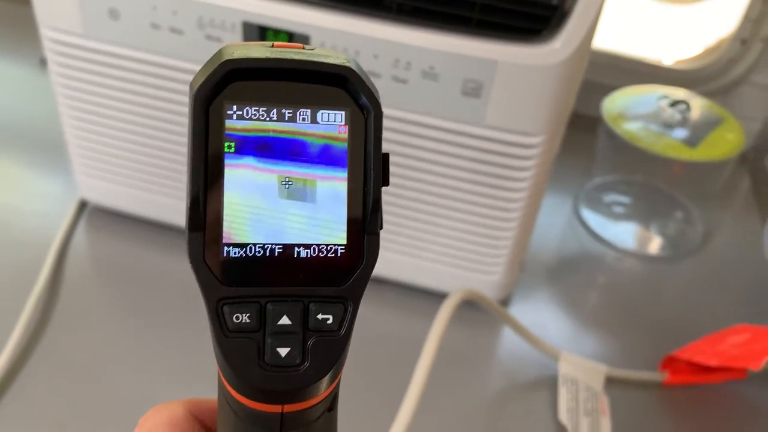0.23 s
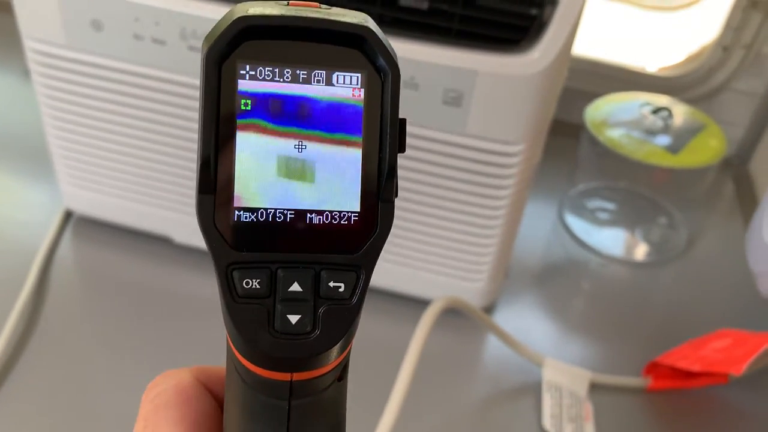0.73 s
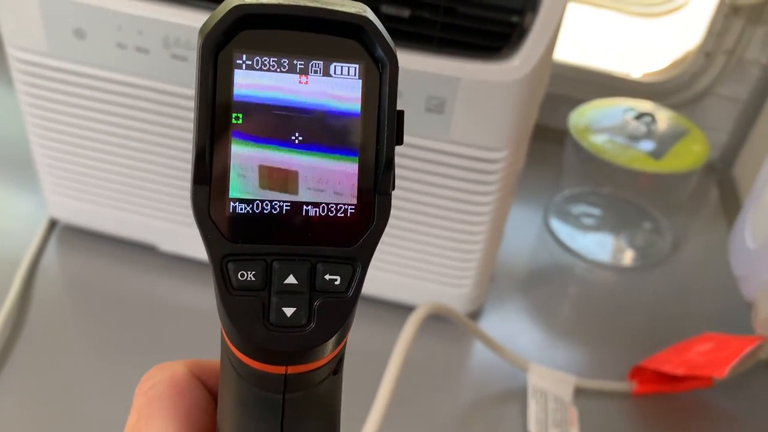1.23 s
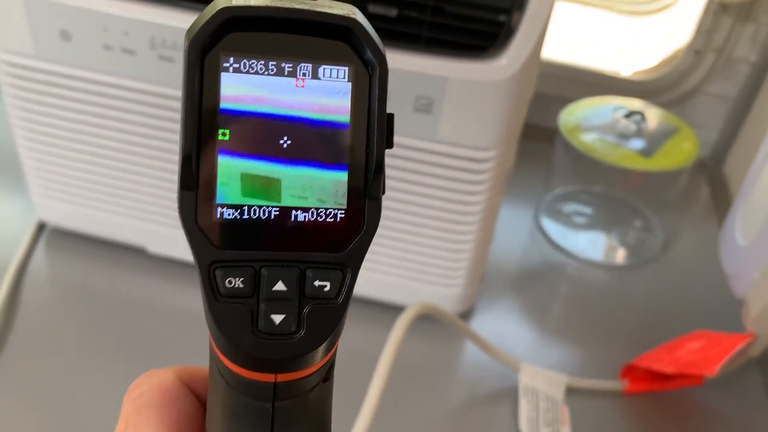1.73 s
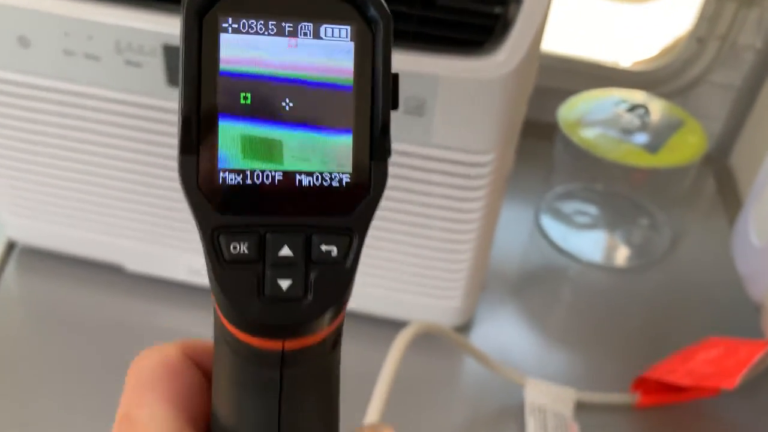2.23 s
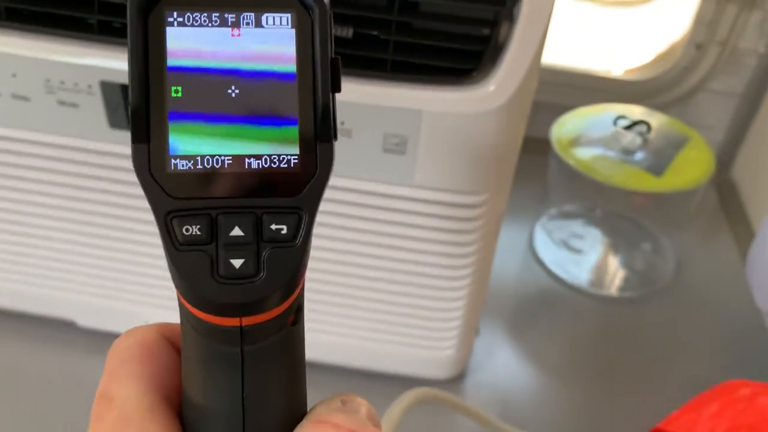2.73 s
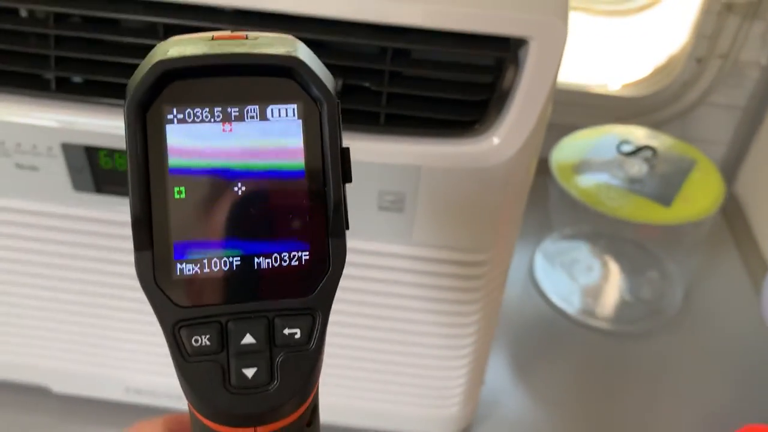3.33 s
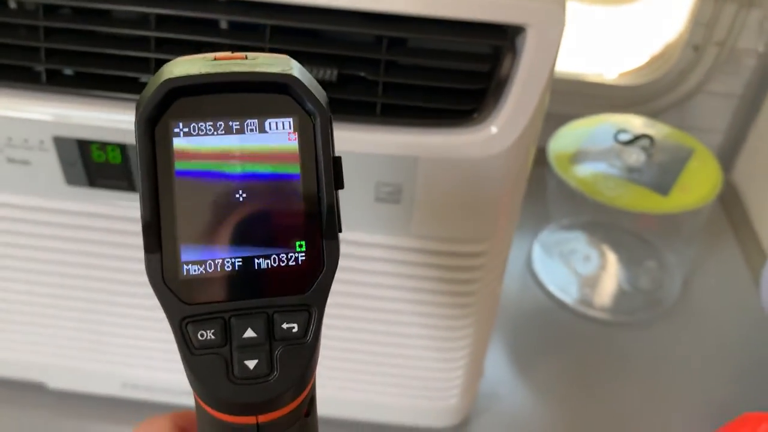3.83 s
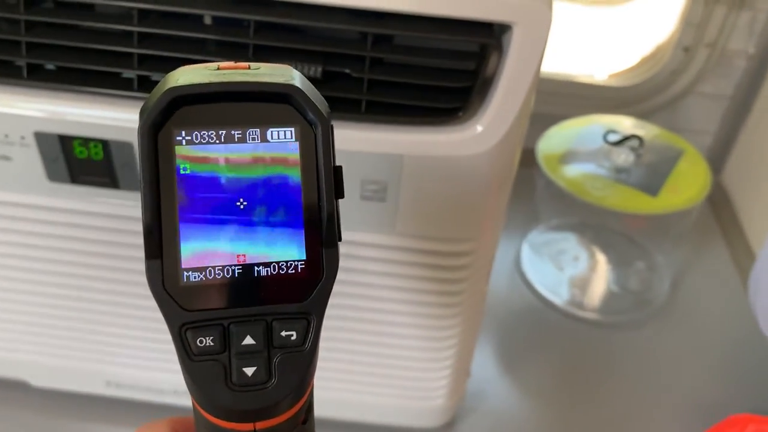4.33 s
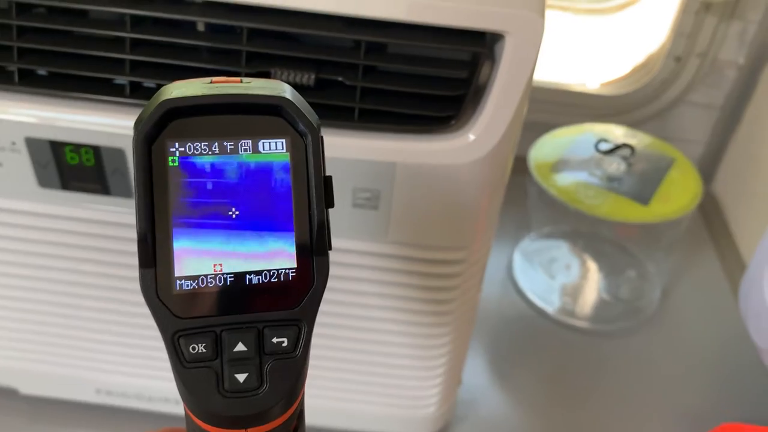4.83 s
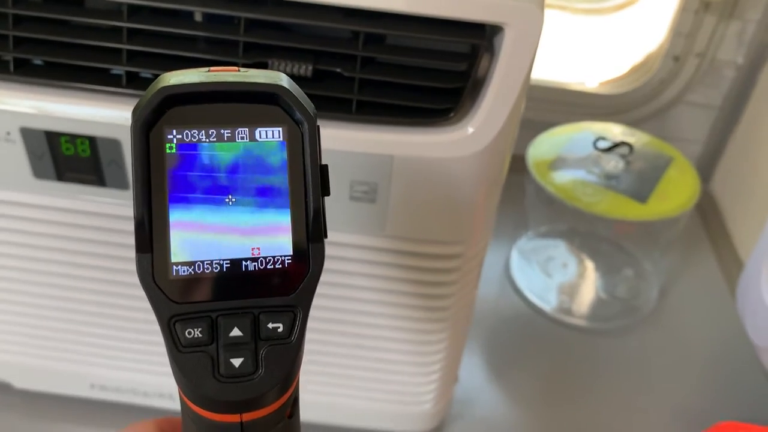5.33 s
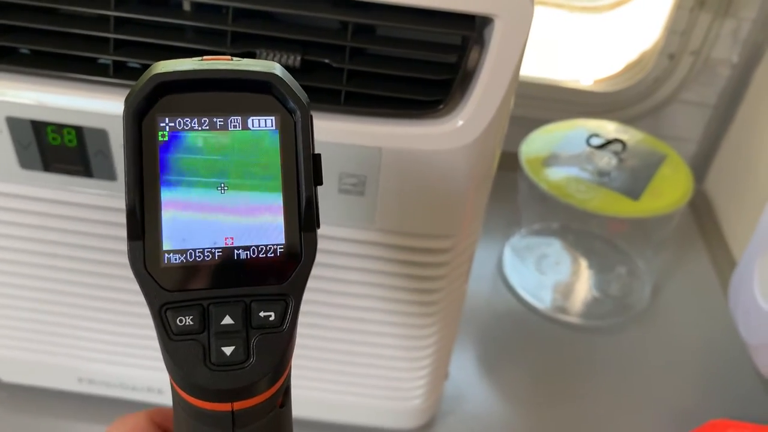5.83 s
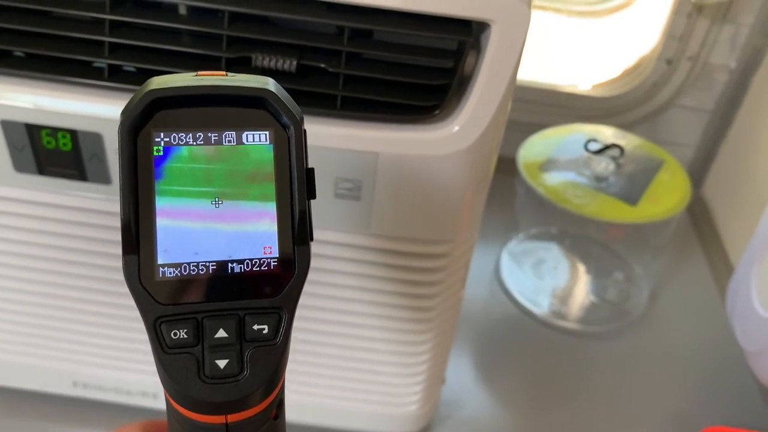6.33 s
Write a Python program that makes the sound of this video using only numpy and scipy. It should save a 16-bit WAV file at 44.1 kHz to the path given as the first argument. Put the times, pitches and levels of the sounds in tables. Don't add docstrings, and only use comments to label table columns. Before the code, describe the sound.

Close stereo capture of a running cooling unit in a cramped camper. Steady electric-motor hum and fan-blade drone beat gently together, with smooth air blowing from the vent and a thin mid-high whine. Halfway through, the hand moves closer; resonances shift quickly and the rumble and airflow become a little stronger. The machine continues evenly to the cut, with three tiny refrigerant squeaks in the final second.

```python
import sys
import numpy as np
from scipy import signal
from scipy.fft import rfft, irfft, next_fast_len
from scipy.io import wavfile
from scipy.ndimage import uniform_filter1d, map_coordinates

SR = 44100
rng = np.random.default_rng(int(sys.argv[2]) if len(sys.argv) > 2 else 0)


def transcribe(u):
    v = np.clip(np.atleast_2d(u).T, -1, 1)
    q = np.round(v * 32767).astype(np.int16)
    wavfile.write(sys.argv[1], SR, q)


def convert_level_to_amplitude(level_db):
    exponent = np.asarray(level_db, float) / 20
    return 10 ** exponent


N = 290178
T = np.arange(N) / SR
FFT_SIZE = next_fast_len(N)
FFT_HZ = np.fft.rfftfreq(FFT_SIZE, 1 / SR)
SHAFT_HZ = 58.028
CYCLE = 65536

# (time [s], share of the way to the second spot [0-1], nearness to the grille [0-1])
PHONE_PATH = [
    (0, 0, 0.06),
    (2.2, 0.09, 0.23),
    (2.6, 0.07, 0.3),
    (2.95, 0.92, 0.5),
    (3.25, 1, 0.72),
    (4.5, 0.99, 0.82),
    (6.58, 1, 0.8),
]


def along(points, hz):
    point_hz, value = np.transpose(points)
    return np.interp(np.log(hz + 1), np.log(point_hz + 1), value)


def phone_path():
    seconds, way, near = np.transpose(PHONE_PATH)
    return np.interp(T, seconds, way), np.interp(T, seconds, near)


def wobble(rate):
    knots = rng.standard_normal(int(N * rate / SR) + 4)
    return map_coordinates(knots, [np.arange(N) * rate / SR])


def leaning(lean):
    lean = np.clip(lean, -1, 1)
    return lean - 1j * np.sqrt(1 - lean ** 2)


def air_db(hz):
    # (frequency
    # [Hz], level per shaft multiple [dB])
    mid_levels = [(15, -77), (40, -53), (70, -38.5), (110, -44), (200, -44.5), (250, -46), (330, -42.5),
                  (400, -49), (480, -55), (650, -56), (800, -54), (1200, -56), (1700, -62.5), (2000, -63.5),
                  (2400, -66), (2800, -70), (3300, -68.5), (4300, -74), (5300, -78.5), (7400, -76),
                (7800, -83), (8600, -97), (9300, -80.5), (10300, -75.5), (12100, -76), (13400, -84.5),
                (14500, -75.5), (15700, -73.5)]
    side_levels = [(15, -89), (60, -64), (120, -59.5), (300, -59.5), (450, -61.5), (600, -58.5), (1000, -58),
                   (1400, -58), (1800, -61.5), (2000, -61),
                   (2250, -68), (2600, -65), (3400, -70.5), (4400, -75.5), (6500, -78.5), (7600, -77.5),
                 (8600, -74), (10000, -78), (11100, -95), (11900, -80), (13300, -71), (14300, -76),
                 (15100, -76), (15500, -100)]
    return np.array([along(mid_levels, hz), along(side_levels, hz)])


def room_db(waves, hz):
    total = 0
    for centre_hz, width_hz, mid_db, side_db in waves:
        bell = np.exp(-((hz - centre_hz) / width_hz) ** 2)
        total = total + np.outer([mid_db, side_db], bell)
    return total


def patchy_noise(patchy_db):
    _, _, grains = signal.stft(rng.standard_normal((2, N)), SR, nperseg=512)
    patches = uniform_filter1d(rng.standard_normal(grains.shape[1:]), 16, 0)
    patches = uniform_filter1d(patches, 5, 1)
    grains = grains * convert_level_to_amplitude(patchy_db * patches / patches.std())
    return signal.istft(grains, SR, nperseg=512)[1][:, :N]


def air(turns, patchy_db, pulse):
    # (frequency [Hz], share of side tied to mid [0-1])
    direct = [(60, 0.5), (300, 0.64), (700, 0.16), (1500, 0.2), (3000, 0.35), (6000, 0.4), (10000, .2),
              (15000, .2)]
    # (frequency [Hz], lean [-1 to 1])
    tilt = [(100, 0.099), (1500, -0.22), (3000, -0.011), (5500, -1.3), (8000, 0.47), (15000, 0)]
    # (frequency [Hz], width [Hz], mid level [dB], side level [dB])
    first_room = [(145, 46, -4, -2), (260, 55, 1.5, 0), (415, 17, 4.5, 4), (453, 54, -4.5, -7),
                  (665, 53, -2.5, 1), (1143, 55, -7, -1), (1360, 150, 0, -6), (2210, 54, 1.5, 6),
                  (2490, 140, -5, -3), (5000, 200, 0, 3)]
    second_room = [(274, 23, -2.5, -2), (400, 20, -5.5, 0), (473, 18, -5.5, 0), (674, 36, -7.5, 1),
                   (722, 21, 4, -7), (907, 13, 10, 0), (941, 33, -11.5, -1), (1200, 59, -6, -6),
                   (1320, 120, -3.5, 1), (1963, 50, -6, -10)]
    own, stray = rfft(patchy_noise(patchy_db), FFT_SIZE)
    share = along(direct, FFT_HZ)
    side = np.sqrt(share) * leaning(along(tilt, FFT_HZ)) * own + np.sqrt(1 - share) * stray
    pair = np.array([own, side])
    pair = pair * convert_level_to_amplitude(air_db(FFT_HZ)) * np.sqrt(SR / 2 / SHAFT_HZ)
    spots = np.array([pair * convert_level_to_amplitude(room_db(room, FFT_HZ)) for room in (first_room, second_room)])

    low = 1 / (1 + (FFT_HZ / 260) ** 4)
    high = 1 / (1 + (5000 / (FFT_HZ + 1)) ** 4)
    bands = (low, 1 - low - high, high)
    rumble, rush, hiss = (irfft(spots * band, FFT_SIZE)[..., :N] for band in bands)
    way, near = phone_path()
    rumble_gain = convert_level_to_amplitude(3 * near)
    hiss_gain = convert_level_to_amplitude(-0.46 + 1.68 * near)
    beat = 1 + pulse * np.cos(2 * np.pi * turns) + 0.065 * wobble(35)
    first, second = rumble_gain * rumble + hiss_gain * (rush + beat * hiss)
    return (1 - way) * first + way * second


def squeak():
    # (time [s], mid level [dB], side level [dB], length [s])
    whistles = [
        (5.887, -58, -48, .04),
        (6.017, -53, -53, 0.086),
        (6.137, -50, -49, 0.05),
    ]
    squeak_hz, side_phase = 1804, 1.6
    tone = np.sin(2 * np.pi * squeak_hz * T + [[0], [side_phase]])
    total = np.zeros((2, N))
    for start, mid_db, side_db, length in whistles:
        half = length / 2
        puff = np.exp(-((T - start - half) / half) ** 4)
        total += np.sqrt(2) * convert_level_to_amplitude([[mid_db], [side_db]]) * puff * tone
    return total


def fan():
    _, near = phone_path()
    blade_hz = 82.58 + 0.142 * wobble(1.1)
    blade_db = -32.5 + 3.5 * near
    octave_db = blade_db - 14.5 + 1.5 * near
    angle = 2 * np.pi * np.cumsum(blade_hz) / SR + 0.038 * wobble(7.5)
    blade = convert_level_to_amplitude(blade_db + 0.54 * wobble(2.71)) * np.exp(1j * angle)
    octave = convert_level_to_amplitude(octave_db + 1.2 * wobble(3.32)) * np.exp(2j * angle)
    side = convert_level_to_amplitude(-18.5) * leaning(0.18) * blade + convert_level_to_amplitude(-14) * leaning(-0.05) * octave
    return np.sqrt(2) * np.real([blade + octave, side])


def shaft_turns(jitter, ripple, reach):
    mains_hz, sag_hz_per_s = 60, 0.0021
    turns = np.cumsum(SHAFT_HZ - sag_hz_per_s * T) / SR
    slip = np.sin(4 * np.pi * (mains_hz - SHAFT_HZ) * T)
    return turns + jitter * wobble(5.5) + ripple * slip + reach * wobble(0.81)


def one_turn(spot, knock, scatter_db, sway):
    # (frequency [Hz], level [dB])
    faint = [(200, -15), (600, -10.5), (2000, -18.5), (4000, -7), (6000, -5.5), (8000, -9), (10500, 0.5),
             (13000, -14.5), (15500, -13)]
    # (shaft multiple,
    # first spot mid level [dB], side level [dB], second spot mid level [dB], side level [dB])
    cabinet_hum = [(1, -32, -48.5, -31, -48), (2, -49.5, -65.5, -46, -62.5), (4, -53, -76, -50, -69),
                   (5, -44, -67, -42.5, -62), (6, -51, -64, -90, -75), (13, -59.5, -70.5, -59, -68.5)]
    shell_ring = [(15, -63, -61.5, -53, -90), (16, -52, -54.5, -59, -56), (17, -65, -53, -55.5, -51),
                  (18, -53, -57, -54, -57), (19, -59.5, -52, -59, -58), (20, -61, -50, -53, -50),
                  (21, -54, -65, -54, -65.5), (22, -42, -57.5, -53.5, -48), (23, -53.5, -64.5, -58.5, -49),
                  (25, -61.5, -57.5, -62.5, -54.5), (26, -72.5, -56.5, -56, -64.5),
                  (27, -56.5, -60, -57.5, -51.5), (28, -67, -58.5, -51.5, -52.5),
                  (30, -59, -72, -64.5, -72.5)]
    pipe_whine = [(31, -65, -72.5, -63, -62.5), (41, -64.5, -64.5, -57.5, -63.5),
                  (54, -67.5, -63, -69, -74.5), (57, -59, -66.5, -66, -65), (61, -72, -66.5, -71, -69.5),
                  (86, -72.5, -79.5, -83, -90), (148, -90, -75.5, -90, -69), (179, -69.5, -90, -74, -90),
                  (197, -70, -90, -81.5, -90), (227, -90, -75, -90, -64)]
    leans = [(.45, .4, -.25), (.45, .05, -.15)]
    order = np.arange(1, len(knock) + 1)
    hz = order * SHAFT_HZ
    scatter = np.minimum(rng.standard_normal((2, len(order))), 1.3)
    level_db = air_db(hz) + along(faint, hz) + scatter_db * scatter
    lean = rng.uniform(-1, 1, len(order))
    for part, part_lean in zip((cabinet_hum, shell_ring, pipe_whine), leans[spot]):
        rows = np.transpose(part)
        k = np.round(rows[0]).astype(int) - 1
        level_db[:, k] = rows[1:].reshape(2, 2, -1)[spot] + 0.24
        lean[k] = part_lean

    phase = np.exp(2j * np.pi * rng.random((3, 2, len(order))))
    slope = sway * np.minimum(hz / 1400, 1.8) * phase
    lines = np.zeros((4, 2, CYCLE // 2 + 1), complex)
    lines[..., order] = convert_level_to_amplitude(level_db) * knock * [np.ones(len(order)), leaning(lean)]
    lines[1:, :, order] *= slope
    return irfft(lines, CYCLE) * CYCLE / np.sqrt(2)


def compressor(turns, smear):
    shell_multiple = 22.5
    short_hz, early_s = 1430, 0.32
    odd_db, odd_hz = 4, 9100
    order = np.arange(1, 271)
    hz = order * SHAFT_HZ
    loose = 1 - np.exp(-((order - shell_multiple) / 1.2) ** 4)
    knock = np.exp(1j * np.cumsum(smear * loose * rng.standard_normal(len(order))))
    knock = knock * convert_level_to_amplitude(odd_db * (order % 2 - 1) * (hz > odd_hz))
    moved = np.exp(2j * np.pi * rng.random(len(order)) * (hz > short_hz))

    at = (turns % 1 * CYCLE).astype(int)
    hand = np.array([np.ones(N), wobble(1.21), wobble(2.46), wobble(4.11)])[:, None]
    spots = []
    for spot in range(2):
        turn = one_turn(spot, knock * moved ** spot, scatter_db=5.0, sway=0.11)
        spots.append((turn[..., at] * hand).sum(axis=0))
    spots = np.array(spots)

    short = irfft(rfft(spots, FFT_SIZE) * (FFT_HZ > short_hz), FFT_SIZE)[..., :N]
    long = spots - short
    way, _ = phone_path()
    early = np.interp(T + early_s, T, way) * np.pi / 2
    long_waves = (1 - way) * long[0] + way * long[1]
    short_waves = np.cos(early) * short[0] + np.sin(early) * short[1]
    return long_waves + short_waves


def scene():
    turns = shaft_turns(jitter=0.00028, ripple=0.00092, reach=0.0017)
    flow = air(turns, patchy_db=1.07, pulse=0.05)
    mid, side = flow + squeak() + fan() + compressor(turns, smear=1.41)
    return np.array([mid + side, mid - side])


def low_pass(x):
    return signal.sosfilt(signal.butter(12, 17040, fs=SR, output="sos"), x)


def record(dry):
    top_hz = 15750
    kept = irfft(rfft(dry, FFT_SIZE) * (FFT_HZ < top_hz), FFT_SIZE)[:, :N]
    return low_pass(kept)


dry = scene()
out = record(dry)
transcribe(out)
```